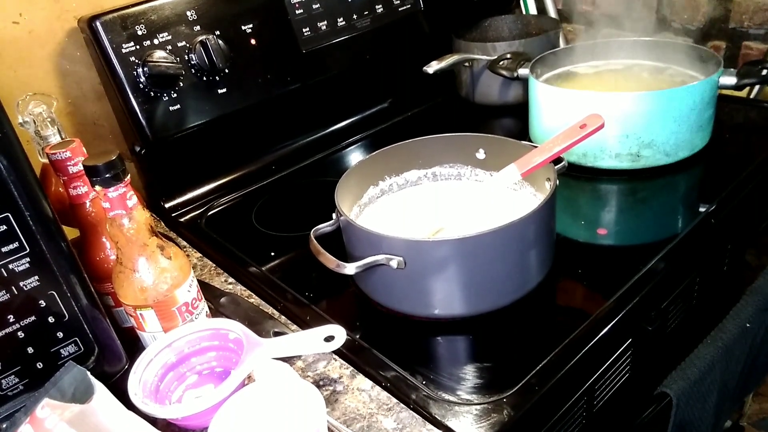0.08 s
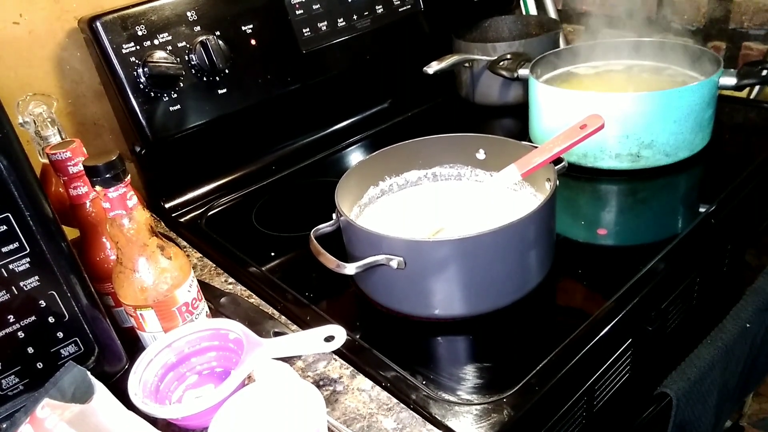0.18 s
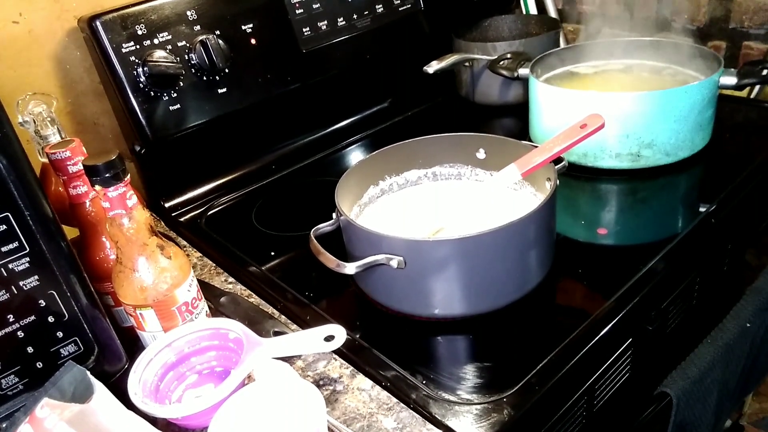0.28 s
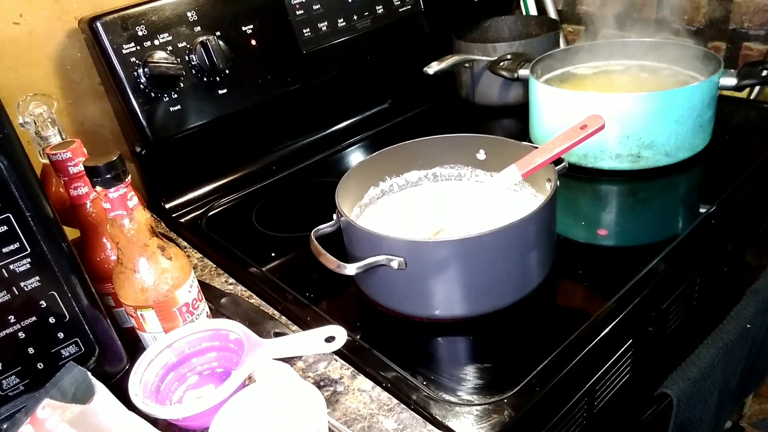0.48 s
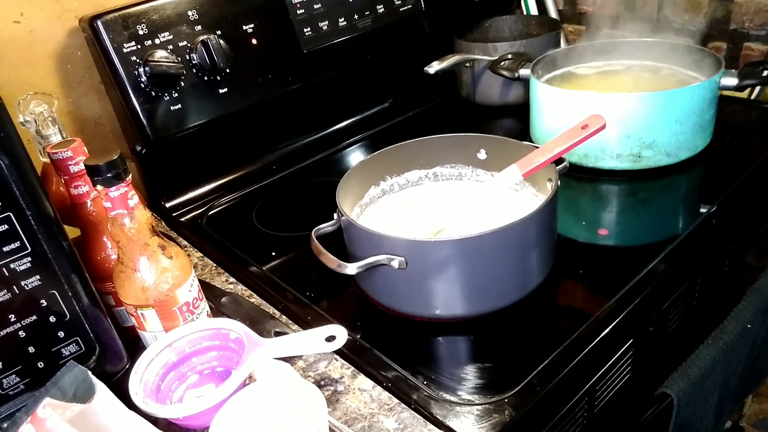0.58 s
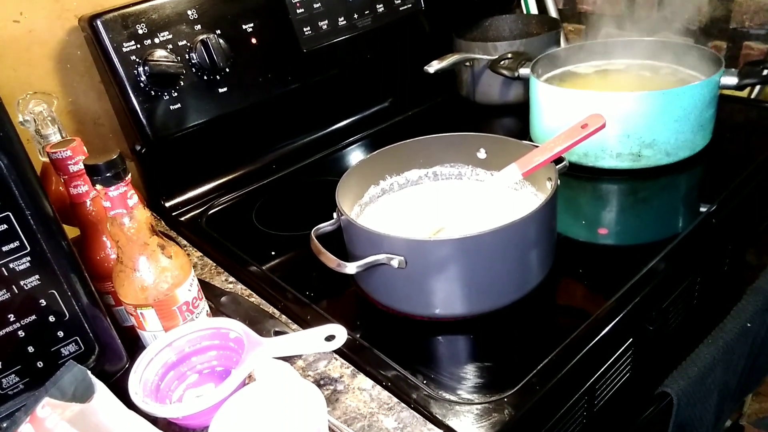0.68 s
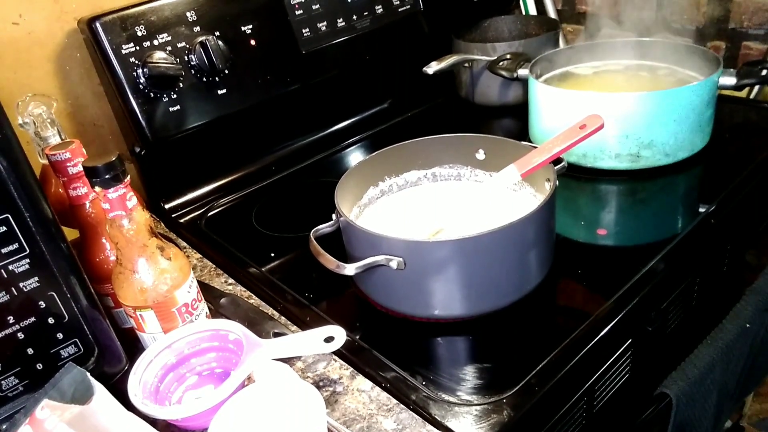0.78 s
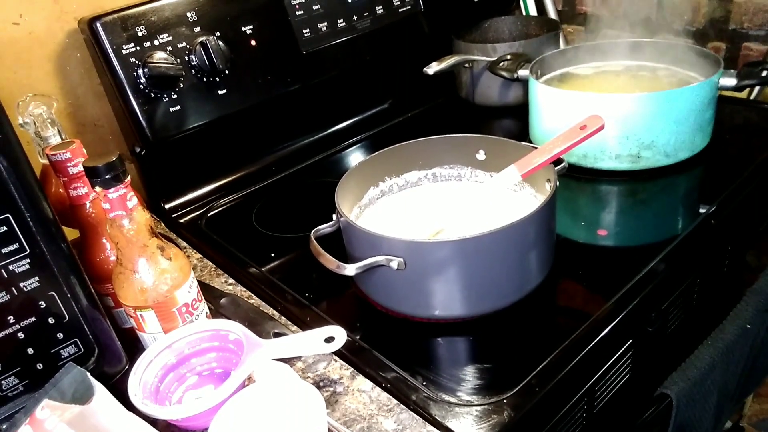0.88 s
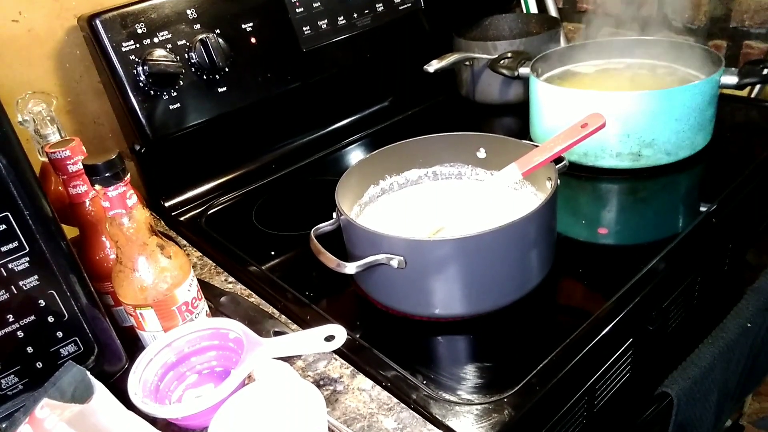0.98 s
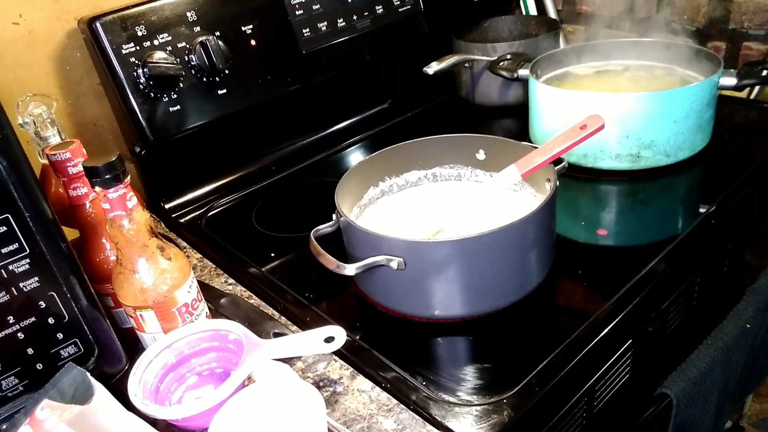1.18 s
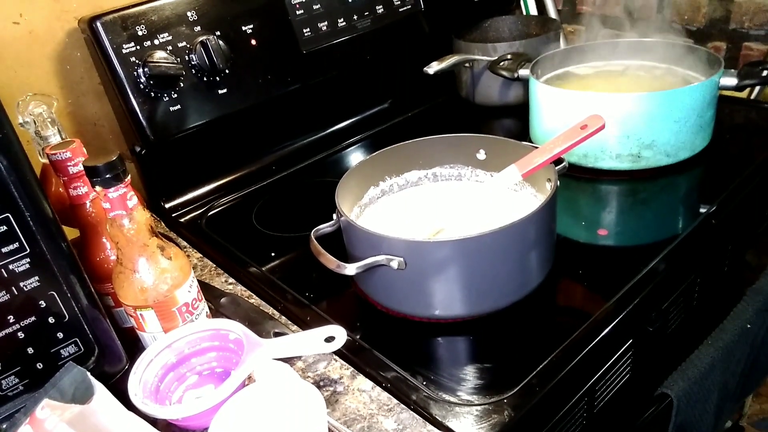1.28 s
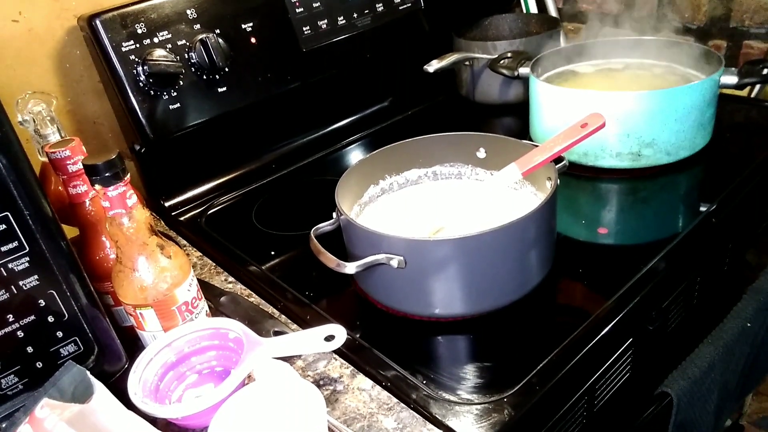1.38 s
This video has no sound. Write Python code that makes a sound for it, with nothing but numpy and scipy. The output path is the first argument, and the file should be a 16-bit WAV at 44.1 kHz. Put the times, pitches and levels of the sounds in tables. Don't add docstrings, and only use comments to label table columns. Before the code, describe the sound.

A light utensil falls in a quiet kitchen, brushing a drawer front, striking a hollow cabinet with loud knocks and sharp clicks, then bouncing weaker on the floor and dragging to rest; close stereo microphones, short room.

```python
import sys
import numpy as np
from scipy import signal
from scipy.fft import rfft, irfft
from scipy.io import wavfile

SR = 44100
rng = np.random.default_rng(int(sys.argv[2]) if len(sys.argv) > 2 else 0)


def undo_db(level):
    steps = np.asarray(level, float) / 20
    return 10 ** steps


def generate_wav(sig):
    pcm = np.round(np.clip(np.atleast_2d(sig).T, -1, 1) * 32767).astype(np.int16)
    wavfile.write(sys.argv[1], SR, pcm)


N = 61740

# f/Hz, level/dB per Hz
AIR_SPECTRUM = [(15, -74), (25, -52), (108, -15.5), (389, -18.5), (524, -17.5), (651, -18), (1680, -27.5),
                (13300, -35.5), (16500, -35.5)]
# f/Hz, width/Hz, level/dB rms
HUM_LINES = [(55, 14, -79), (118, 12, -74), (535, 30, -84), (1660, 25, -88)]
# f/Hz, likeness/1
LIKENESS = [(60, 1), (200, 0.92), (400, 0.88), (700, 0.43), (1400, -0.075), (3100, -0.091), (8000, .03)]
# f/Hz, t60/s
ROOM_DECAY = [(60, 0.46), (150, 0.48), (400, 0.27), (1000, 0.25), (3000, 0.25), (7000, 0.2), (15000, 0.3)]
# f/Hz, level/dB
ROOM_COLOUR = [(60, -3.5), (300, 12), (1000, 15.5), (3000, 11), (6000, 6), (11000, 9.5), (16000, 5.5)]
# f/Hz, level/dB
MIC_LEAN = [(100, -1.5), (1000, -1), (5000, -.5), (9000, -3.5), (15000, -4)]
# t/s, length/s, level/dB rms, centre f/Hz, width/Hz
RUSTLES = [(.005, 0.049, -66.5, 9700, 4040), (0.126, 0.038, -66.5, 6530, 5000),
           (0.641, 0.17, -67.5, 9700, 3020), (0.696, 0.095, -61, 9000, 5000),
           (0.808, 0.051, -63.5, 6760, 6000), (0.859, .05, -63, 12500, 2500),
           (1.156, .01, -66.5, 13200, 3020), (1.161, 0.037, -58.5, 8930, 1305),
           (1.1615, 0.039, -65.5, 4530, 1985), (1.239, 0.032, -64.5, 5050, 4000),
           (1.27, 0.1, -66, 7010, 4860), (1.319, 0.041, -54.5, 9100, 1400), (1.32, 0.043, -60, 5640, 2500),
           (1.346, 0.068, -63.5, 9000, 1500), (1.384, 0.074, -59, 1600, 1200)]
# f/Hz, level/dB, t60/s
DRAWER_MODES = [(226, -6, 0.081), (417, -11, 0.28), (546, -1, 0.2), (770.6, -6, 0.12), (1030, -16, .1),
                (1130, -11.5, 0.038), (1440, -16.5, 0.035)]
# f/Hz, level/dB, t60/s
HANDLE_MODES = [(403, 0, .05), (500, -9, .03), (700, -7, .025), (870, -6, .025), (1300, 2, .007),
                (2300, 1, .004), (3400, 1, .003)]
# f/Hz, level/dB
SNAP_SPECTRUM = [(300, -28), (1000, -4), (3000, -2.5), (5500, -3.5), (8000, -3.5), (10500, -5.5),
                 (12500, -16.5), (16000, -19)]
# t/s, peak level/dB, f/Hz, left-right/dB, room share/dB
SKITTER = [(.3685, -29, 7500, 2.5, -3), (.4062, -18.5, 8700, 2.5, -4), (.4981, -17.5, 8500, 3, -4),
           (.8556, -41, 7500, -2, -4), (.8592, -40, 8300, -2, -4), (.8632, -34.5, 8800, -2, -4),
           (.8666, -36.5, 8400, -2, -4), (.8698, -35, 8800, -2, -4), (.8731, -35.5, 9300, -2, -4),
           (.8765, -39, 9000, -2, -4), (.8822, -39.5, 9500, -2, -4), (.8853, -37, 9800, -2, -4),
           (.8880, -41, 7500, -2, -3), (.8935, -48, 8500, -2, 2), (.900, -50, 8500, -2, -1)]
# t/s, peak level/dB, f/Hz, ring t60/ms, room share/dB
TICKS = [(0.201, -54, 5050, 0.99, 19.5), (0.2379, -37, 4000, 5.1, 5.5), (0.2411, -22.5, 3600, 1.8, 11),
         (0.2446, 0, 6130, 5, 3.5), (0.2476, -18.5, 6700, 8.4, 2.5), (0.2476, -18, 6140, 6, -5.5),
         (0.2552, -8.5, 5800, 4, 2.5), (0.2587, 0.5, 5850, 6, -2.5), (0.2616, -14, 6140, 8, -2),
         (0.2684, -6, 6200, 4, 4.5), (0.2787, -22, 6105, 7.2, 1.5), (0.291, -14, 5000, 6.3, 5),
         (0.4689, -14, 5500, 1.4, 3), (0.4821, -14, 4360, 2.5, -3), (.6130, -26, 5510, 0.83, 4),
         (0.6239, -36.5, 4595, 2.3, 0)]
# f/Hz, level/dB, t60/s
PANEL_MODES = [(200, 1.5, 0.079), (233, -3, 0.21), (290, -2, 0.097), (385, -0.5, 0.14), (500, -2, 0.08),
               (563, -0.5, 0.057), (672, -8, 0.12), (783, -2.5, 0.048), (912, -6, 0.038),
               (1004.7, -5.5, 0.065), (1252, -4.5, 0.019), (1600, -10, 0.007), (2200, -8.5, 0.0046)]
# f/Hz, level/dB, t60/s
CABINET_HOLLOW = [(57, -14, .3), (99.8, 5, 0.053), (122.5, -1, 0.042), (150.4, -9, 0.071)]
# f/Hz, level/dB, t60/s
BOARD_MODES = [(228.5, 0, 0.12), (355, -0.5, 0.095), (383, -9.5, 0.072), (485.4, -2.5, 0.063),
               (578, 1, 0.042), (677, -1.5, 0.058), (800, -6, 0.063), (930, -0.5, 0.029), (1247, 0, 0.017),
               (2130, 4, 0.0049)]
# f/Hz, level/dB, t60/s
FLOOR_HOLLOW = [(57.3, -23, .2), (106.1, -4, 0.13), (132, -6.5, 0.12), (161, -5, 0.054)]
# t/s, boom peak level/dB, knock peak level/dB, contact/ms, favoured f/Hz
CABINET_BLOWS = [
    (0.2374, -24, -21.5, 0.35, 290),
    (0.244, -34, -13.5, 0.51, 290),
    (.2525, -43.5, -16.5, 0.64, 540),
    (0.262, -23, -19.5, 0.46, 800),
    (.275, -22, -20.5, .5, 385),
    (.290, -29.5, -23, 0.6, 245),
    (.312, -24, -24.5, 0.56, 385),
    (.352, -31.5, -34, 0.35, 537),
    (0.407, -53, -35.5, 0.084, 800),
]
# t/s, boom peak level/dB, knock peak level/dB, contact/ms, favoured f/Hz
FLOOR_BOUNCES = [(0.463, -27.5, -26, 0.3, 355), (.478, -61, -27, 0.43, 557), (.497, -30, -34, 0.22, 720),
                 (0.525, -35, -38.5, 1, 360), (0.564, -52, -51, 0.88, 200), (.607, -29, -31, 0.22, 355),
                 (0.628, -37.5, -32, 0.77, 520), (0.664, -39.5, -44, 0.46, 485),
                 (.703, -38.5, -42, 0.8, 234), (.785, -36, -41, 0.74, 355),
                 (0.8428, -42.5, -48.5, 0.65, 355), (0.883, -48.5, -51, 0.63, 238),
                 (0.94, -62.5, -60, 0.88, 383)]

THUMP_PAN_DB = -0.5


def read(points, hz):
    f, value = np.transpose(points)
    return np.interp(np.log(hz + 1), np.log(f + 1), value)


def evened(x):
    return x / np.sqrt(np.mean(x ** 2) + 1e-20)


def peaked(x):
    return x / abs(x).max()


def add(mix, s, sound):
    part = mix[:, round(s * SR):][:, :sound.shape[1]]
    part += sound[:, :part.shape[1]]


def pair(left, other, hz):
    same = np.clip(read(LIKENESS, hz), -1, 1)
    return np.array([left, same * left + np.sqrt(1 - same ** 2) * other])


def diffuse(size, field_db):
    frames = size // 64 + 5
    hz = np.fft.rfftfreq(256, 1 / SR)[:, None]
    a, b, c, d = rng.standard_normal((frames, 129, 4)).T
    z = pair(a + 1j * b, c + 1j * d, hz)
    z = z * undo_db(field_db(hz, np.arange(frames) * 64 / SR))
    return signal.istft(z, nperseg=256, noverlap=192)[1][:, :size]


def placed(x, pan_db, wet_db, lag_ms):
    tail = diffuse(SR // 2, lambda hz, t: read(ROOM_COLOUR, hz) - 60 * t / read(ROOM_DECAY, hz))
    tail *= np.minimum(np.arange(tail.shape[1]) / (0.0012 * SR), 1)
    path = undo_db(wet_db) * tail / np.linalg.norm(tail[0])
    lag = round(lag_ms * SR / 1000)
    path[0, max(lag, 0)] = undo_db(pan_db / 2)
    path[1, max(-lag, 0)] = undo_db(-pan_db / 2)
    return signal.fftconvolve(x[None], path, axes=1)


def modes(table, size, spread_db, flip=-1.016):
    hz, db, t60 = np.transpose(table)[:, :, None]
    t = np.arange(size) / SR
    spot = undo_db(spread_db * rng.standard_normal((len(table), 1)))
    spot = spot * flip ** np.cumsum(np.arange(len(table)))[:, None]
    return (spot * undo_db(db - 60 * t / t60) * np.sin(2 * np.pi * hz * t)).sum(0)


def air():
    hz = np.fft.rfftfreq(N, 1 / SR)
    a, b = rfft(rng.standard_normal((N, 2)).T)
    z = pair(a, b, hz)
    bed = undo_db(-67.5) * evened(irfft(z * undo_db(read(AIR_SPECTRUM, hz)), N))
    for f, width_hz, db in HUM_LINES:
        bed = bed + undo_db(db) * evened(irfft(z / (1 + ((hz - f) / width_hz) ** 2), N))
    return bed


def rustle(length, db, hz, width_hz):
    t = np.arange(round(3 * length * SR)) / SR
    band = diffuse(len(t), lambda f, s: -6 * ((f - hz) / width_hz) ** 2 + 6.7 * rng.standard_normal(len(s)))
    return undo_db(db - 14 * t / length) * np.minimum(t / 0.0033, 1) * evened(band)


def touch():
    ring = modes(DRAWER_MODES, size=SR // 4, spread_db=1)
    ring *= np.minimum(np.arange(SR // 4) / (0.0044 * SR), 1)
    return placed(undo_db(-31.5) * peaked(ring), THUMP_PAN_DB, wet_db=-1.5, lag_ms=0)


def drag():
    swell_s, hold_s, release_s = .012, .045, .035
    t = np.arange(SR // 5) / SR
    held = swell_s + hold_s
    slips = rng.standard_normal(len(t)) * undo_db(3 * rng.exponential(1, len(t)))
    slips *= rng.random(len(t)) < .1
    shape = np.minimum(t / swell_s, 1) * undo_db(-60 * np.maximum(t - held, 0) / release_s)
    ring = signal.fftconvolve(slips * shape, modes(HANDLE_MODES, size=SR // 10, spread_db=0))
    level = np.std(ring[:round(held * SR)])
    return placed(undo_db(-51) * ring / level, THUMP_PAN_DB, wet_db=-8, lag_ms=0)


def tick(db, hz, ring_ms, edge_db, pan_db, wet_db, lag_ms, top_db):
    f = abs(np.fft.fftfreq(1024, 1 / SR))
    snap_db = read(SNAP_SPECTRUM, f) + top_db * np.clip((f - 8000) / 5000, 0, 1)
    log_gain = np.log(undo_db(snap_db))
    snap = np.fft.ifft(np.exp(np.conj(signal.hilbert(log_gain)))).real[:300]
    ring = modes([(hz, 0, max(ring_ms, .5) / 1000)], size=500, spread_db=0)
    edge = np.gradient(np.convolve(ring, snap)[:500])
    both = peaked(np.pad(peaked(snap), (0, 200)) + undo_db(edge_db) * peaked(edge))
    return placed(undo_db(db) * both, pan_db, wet_db, lag_ms)


def thump(wood, hollow, boom_db, knock_db, contact_ms, spot_hz):
    size, favour_db, favour_octaves, boom_rise_s = SR // 4, 4.5, .25, .008
    struck = []
    for f, db, t60 in wood:
        nearness = np.exp(-(np.log2(f / spot_hz) / favour_octaves) ** 2)
        struck.append((f, db + favour_db * nearness, t60))
    u = np.arange(800) / (SR * np.clip(contact_ms, .1, 8) / 4000)
    push = u * np.exp(-u)
    knock = signal.fftconvolve(modes(struck, size, spread_db=1.5), push)[:size]
    boom = -modes(hollow, size, spread_db=2, flip=1.)
    boom *= np.minimum(np.arange(size) / (boom_rise_s * SR), 1)
    return (placed(undo_db(knock_db) * peaked(knock), THUMP_PAN_DB, wet_db=-5, lag_ms=0)
            + placed(undo_db(boom_db) * peaked(boom), THUMP_PAN_DB, wet_db=-10, lag_ms=0))


def scene():
    mix = air()
    for s, *row in RUSTLES:
        add(mix, s, rustle(*row))
    add(mix, .2015, touch())
    add(mix, .854, drag())
    for s, db, hz, pan_db, wet_db in SKITTER:
        add(mix, s, tick(db, hz, ring_ms=.8, edge_db=4, pan_db=pan_db, wet_db=wet_db, lag_ms=-.02, top_db=-6.5))
    for s, db, hz, ring_ms, wet_db in TICKS:
        add(mix, s, tick(db, hz, ring_ms, edge_db=-8, pan_db=6.5, wet_db=wet_db, lag_ms=.19, top_db=-4.5))
    for s, *row in CABINET_BLOWS:
        add(mix, s, thump(PANEL_MODES, CABINET_HOLLOW, *row))
    for s, *row in FLOOR_BOUNCES:
        add(mix, s, thump(BOARD_MODES, FLOOR_HOLLOW, *row))
    return mix


def roll_off(x):
    return signal.sosfilt(signal.butter(12, 16700, fs=SR, output="sos"), x)


def record(dry):
    low_hz, top_hz, ceiling = 42, 16150, .9
    lean = undo_db(read(MIC_LEAN, np.fft.rfftfreq(N, 1 / SR)) / 2)
    x = irfft(rfft(dry) * np.array([lean, 1 / lean]), N)
    x = signal.sosfilt(signal.butter(3, low_hz, "high", fs=SR, output="sos"), x)
    x = x / (1 + (x / ceiling) ** 8) ** (1 / 8)
    x = signal.oaconvolve(x, signal.firwin(511, top_hz, fs=SR)[None], "same")
    mix = 1.017 * x
    return roll_off(mix)


dry = scene()
out = record(dry)
generate_wav(out)
```